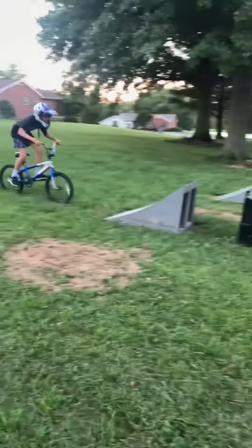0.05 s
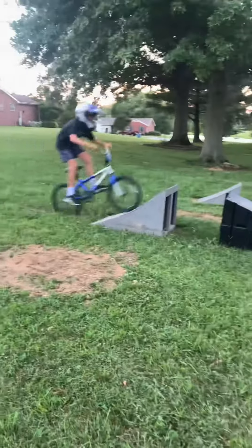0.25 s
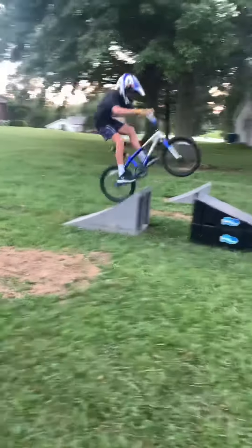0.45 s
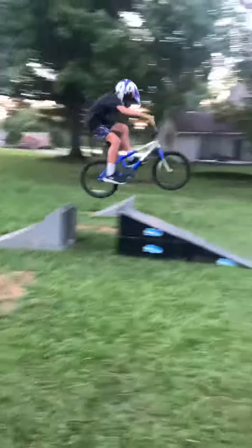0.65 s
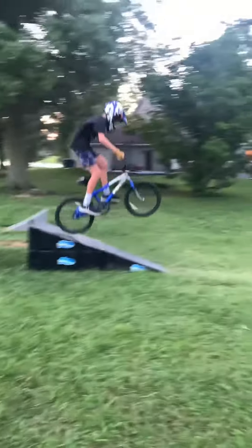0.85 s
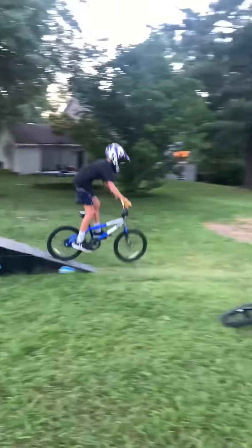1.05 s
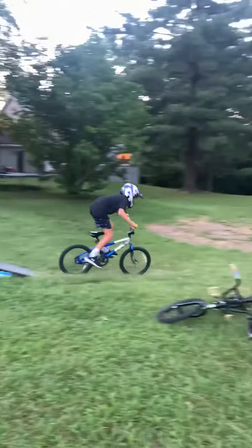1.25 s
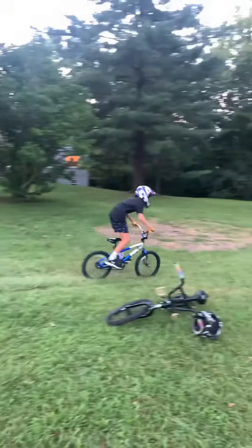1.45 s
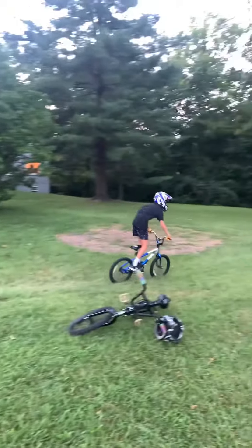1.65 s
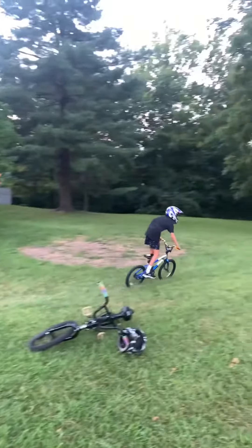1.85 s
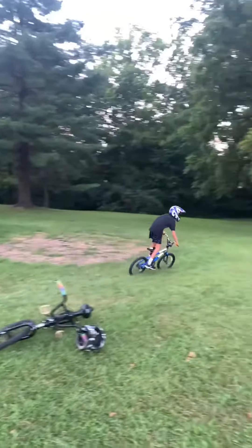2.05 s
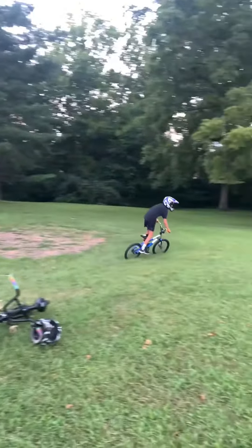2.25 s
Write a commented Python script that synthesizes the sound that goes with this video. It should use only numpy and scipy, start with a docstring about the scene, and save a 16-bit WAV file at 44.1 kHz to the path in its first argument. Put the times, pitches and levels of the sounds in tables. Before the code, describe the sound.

A bicycle jumps a ramp with hollow thumps and chain clacks, then rolls across grass.

```python
"""In a grassy yard, a child rides a small bike over a ramp, lands on a second ramp and rolls away. The tyres
rustle through the grass over a low rumble, while insects hiss in the trees over a faint far hum. Chain and
frame clack, rubber slaps the hollow ramps, each wheel's weight makes them boom, and the tread drums after the
landing. Two microphones, close together, hear it all."""
import sys
import numpy as np
from scipy import signal
from scipy.fft import rfft, irfft
from scipy.io import wavfile
from scipy.ndimage import uniform_filter1d

SR = 44100
rng = np.random.default_rng(int(sys.argv[2]) if len(sys.argv) > 2 else 0)


def transcribe(signal):
    """Save signal, clipped to [-1, 1], as a 16-bit WAV file at the path in sys.argv[1]."""
    frames = np.atleast_2d(signal).T
    limited = np.clip(frames, -1, 1)
    pcm = np.round(limited * 32767).astype(np.int16)
    wavfile.write(sys.argv[1], SR, pcm)


N = 101429
T, HZ = np.arange(N) / SR, np.fft.rfftfreq(N, 1 / SR)


def amp(db):
    """Turns decibels into a multiplier."""
    return 10 ** (np.asarray(db) / 20)


def unit(x):
    """Scales a signal to an average power of 1."""
    return x / np.sqrt(np.mean(x ** 2) + 1e-20)


def over_frequency(points):
    """Joins a table's points into a curve on a log frequency axis."""
    f, value = np.transpose(points)
    return np.interp(np.log(HZ + 1), np.log(f + 1), value)


def loudness(points):
    """Joins (time, dB) points into a volume curve."""
    return amp(np.interp(T, *np.transpose(points)))


def colour(x, tone):
    """Gives white noise a tone at the same power, fading beyond the table's ends."""
    above = 1 + (HZ / tone[-1][0] / 1.79) ** 8
    below = 1 + (tone[0][0] / 2 / (HZ + 1)) ** 4
    return irfft(rfft(x) * unit(amp(over_frequency(tone)) / above / below), N)


def noise():
    """Two unrelated white noises."""
    return rng.standard_normal((2, N))


def drift(samples):
    """A random wobble; more samples make it slower."""
    return unit(uniform_filter1d(rng.standard_normal(N), size=samples))


def burst(start, hold, fall):
    """Switches on at once, holds, then dies away."""
    return (T >= start) * np.exp(-np.maximum(T - start - hold, 0) / fall)


def ring(start, notes):
    """Notes struck together; each fades by 60 dB over its ring time."""
    t = np.maximum(T - start, 0)[T < start + max(note[2] for note in notes)]
    sound = sum(amp(db - 60 * t / ring_s) * np.sin(2 * np.pi * hz * t) for hz, db, ring_s in notes)
    return np.pad(sound, (0, N - len(t)))


def struck(start, notes, spread_db=4.5):
    """A ring whose notes are louder or softer depending on where the blow lands."""
    changes = spread_db * rng.standard_normal(len(notes))
    return ring(start, [(hz, db + change, ring_s) for (hz, db, ring_s), change in zip(notes, changes)])


def resonant(x, depth_db=3):
    """Many small parts ring briefly: random peaks a few hundred Hz wide and about 20 ms long."""
    slices = signal.stft(x, nperseg=256, noverlap=192)[2]
    peaks = uniform_filter1d(rng.standard_normal(slices.shape[1:]), 14, axis=1)  # smooth in time
    peaks = unit(uniform_filter1d(peaks, 3, axis=0))  # and in frequency
    slices *= amp(depth_db * np.minimum(peaks, 2))
    return unit(signal.istft(slices, nperseg=256, noverlap=192)[1][:, :N])


# How loud the grass rustles: t/s, level/dB
RUSTLE_LEVEL = [(0, -48.5), (.17, -49), (.26, -42.5), (.48, -50), (.62, -63), (.88, -64.5), (.91, -49),
                (1.12, -50.5), (1.19, -45.5), (1.45, -50.5), (1.68, -53), (2.3, -53)]
# Tone of the rustle: f/Hz, level/dB
RUSTLE_TONE = [(200, 0), (600, 0), (1100, -3.5), (1700, 1), (2200, -5.5), (3000, -1.5), (4000, 3.5),
               (7000, 2.5), (10500, -2), (14500, -4.5)]
# How loud the low rumble is: t/s, level/dB
RUMBLE_LEVEL = [(0, -58), (.19, -43), (.27, -33.5), (.32, -46), (.42, -44.5), (.68, -44.5), (.88, -60.5),
                (.93, -39.5), (1.15, -47), (1.27, -54), (1.5, -51), (2.3, -56.5)]
# Tone of the rumble: f/Hz, level/dB
RUMBLE_TONE = [(20, -43), (40, 6.5), (60, 9), (100, 7), (160, -2), (220, -27), (290, -13), (400, -20.5),
               (800, -21), (2000, -89)]
def tyres(blades_per_s=4000, blade_db=-0.5, clump_db=1.5):
    """Grass blades snap in clumps under the tyres, over a low rumble."""
    snaps = rng.random(N) < blades_per_s / SR
    strength = amp(blade_db * np.minimum(rng.exponential(1, N), 4))
    clumps = amp(clump_db * drift(400))
    grass = resonant(snaps * strength * clumps * noise())
    rustle = colour(grass * loudness(RUSTLE_LEVEL), RUSTLE_TONE)
    rumble = colour(noise(), RUMBLE_TONE) * loudness(RUMBLE_LEVEL)
    return rustle + rumble


# How fast each insect pulses, on average: f/Hz
INSECT_RATES = [39, 56, 87, 70]
# Tone of the chorus: f/Hz, level/dB
INSECT_TONE = [(2500, -84), (3300, -21), (4000, -5), (4800, -6), (5700, 0.5), (6800, 0), (8200, -7),
               (9300, -18), (10600, -22), (13000, -34)]
def insects(level_db=-46.5, pulse_depth=0.12, wander=0.093):
    """Far-off insects, each pulsing at its own unsteady rate, blend into a hiss."""
    chorus = np.zeros((2, N))
    for rate in INSECT_RATES:
        cycles = np.cumsum(rate * (1 + wander * drift(4000))) / SR
        chorus += noise() * (1 + pulse_depth * np.sin(2 * np.pi * (cycles + rng.random())))
    return amp(level_db) * colour(unit(chorus), INSECT_TONE)


# Notes of the hum: f/Hz, level/dB
HUM_NOTES = [(62, -62), (83, -56.5), (124, -57), (770, -73)]
# Tone of the open air: f/Hz, level/dB
AIR_TONE = [(20, -25), (45, 0), (80, -4.5), (130, -8.5), (190, -13.5), (400, -16.5), (750, -23.5),
            (1100, -30.5), (2000, -40.5), (9000, -34.5), (13400, -26), (14200, -35)]
def air_and_hum(air_db=-55.5, hum_width_hz=3.8):
    """Outdoor air and a far-off hum, whose notes waver because they are thin bands of noise."""
    hum = np.zeros((2, N))
    for hz, db in HUM_NOTES:
        band = np.exp(-((HZ - hz) / hum_width_hz) ** 2)
        hum += amp(db) * unit(irfft(rfft(noise()) * band, N))
    return hum + amp(air_db) * colour(noise(), AIR_TONE)


# Chain and frame clacks: t/s, low level/dB, middle level/dB, high level/dB, rattle length/s
CLACKS = [(0.099, -48, -52, -49, 0.013), (0.203, -40.5, -69, -59, 0.00079), (0.2084, -65, -62, -42, 0.0027),
          (0.277, -48, -43, -46, 0.0084), (0.327, -40.5, -42, -53, 0.001),
          (0.3405, -32.5, -35.5, -37, 0.005), (0.425, -43, -34, -62, 0.01), (0.49, -50, -64, -70, 0.0036),
          (0.58, -54.5, -63, -84, 0.041), (1.127, -44, -67, -48.5, 0.0083),
          (1.171, -34.5, -58, -48, 0.0043), (1.1753, -46, -52, -32, 0.0018), (1.202, -48, -68, -49, 0.0053),
          (1.247, -40.5, -70, -64, 0.0061), (1.276, -44.5, -43, -64, 0.012),
          (1.323, -46.5, -47, -64, 0.006), (1.342, -48, -53, -41.5, 0.0048),
          (1.511, -36, -39.5, -54, 0.0066), (1.7503, -36, -42, -47, 0.0018),
          (2.274, -46.5, -59, -66, 0.012)]
# Tones of a clack's low, middle and high parts, one list each: f/Hz, level/dB
CLACK_TONES = [
    [(700, -19.5), (1500, -7), (2100, -7.5), (2600, -2), (4000, 2.5), (5200, -2.5)],
    [(3800, -35), (5200, -7.5), (6500, 5.5), (7500, -3.5), (8800, 13.5), (10000, -2.5)],
    [(8000, -8), (9600, -7), (11200, 11), (13200, 5.5), (14000, 14), (16000, -47)],
]
# Notes of the steel frame: f/Hz, level/dB, ring time/s
FRAME_NOTES = [(1560, -10, 0.12), (2090, -12, 0.2), (3820, 2, 0.07), (7300, 4, .06), (8242, 3, .05),
               (11100, 0, 0.15)]
# Single spokes ping under load: t/s, f/Hz, level/dB, ring time/s
SPOKE_PINGS = [(.214, 3410, -42.5, .09), (.214, 1465, -44, .11), (.272, 3610, -38.5, .12),
               (.341, 3605, -38.5, .18), (.428, 2335, -43, .11), (.428, 2085, -50, .33),
               (.428, 3900, -35, .05), (1.247, 3820, -44, .13), (1.5135, 3830, -32, .075),
               (1.5135, 2530, -43, .045), (1.7495, 2500, -46.5, .05)]
# How loud the slack chain ticks between clacks: t/s, level/dB
TICK_LEVEL = [(.2, -54), (.45, -62), (.65, -64), (1.05, -65.5), (1.2, -51.5), (1.47, -50.5), (1.7, -63)]
def chain_and_frame(frame_db=-13, tail_db=-21, ticks_per_s=90, tick_s=0.002):
    """Chain links hit in tight clusters and tick in between; frame and spokes ring briefly."""
    rattle, steel = np.zeros((3, N)), np.zeros((2, N))
    for start, *levels_db, hold in CLACKS:
        shape = burst(start, hold, fall=0.0042) + amp(tail_db) * burst(start, hold, fall=0.028)
        rattle += amp(levels_db)[:, None] * shape
        steel[0] += amp(np.mean(levels_db) + frame_db) * struck(start, FRAME_NOTES)
    for start, *note in SPOKE_PINGS:
        steel[0] += ring(start, [note])
    ticks = rng.random(N) < ticks_per_s / SR
    fading_ticks = signal.lfilter([1], [1, -np.exp(-1 / (tick_s * SR))], ticks)
    rattle += loudness(TICK_LEVEL) * fading_ticks
    links = resonant(noise())
    return steel + sum(colour(links * part, tone) for part, tone in zip(rattle, CLACK_TONES))


# A tyre hits a ramp or the ground: t/s, level/dB, contact time/s
SLAPS = [(0.2018, -35, 0.016), (.3280, -31.5, 0.024), (0.36, -34.5, 0.022), (0.427, -37.5, 0.0024),
         (0.4883, -46, 0.002), (0.585, -47, 0.025), (1.126, -39.5, 0.007)]
# Tone of the rubber once it has flattened: f/Hz, level/dB
RUBBER_TONE = [(250, -2.5), (430, -7), (760, -13.5), (1000, -23.5), (1600, -17.5), (3500, -33)]
# Notes of the deck, the ramp's top: f/Hz, level/dB, ring time/s
DECK_NOTES = [(304.3, -6, 0.21), (375, -7, 0.092), (590, -20, 0.19), (730, -3, 0.13), (787, -6, 0.057),
              (1110, -3, 0.05), (1160, -9.5, 0.23), (1640, -13.5, 0.27)]
def tyre_slaps(slap_db=-7.5, deck_db=-9.5, start_speed=5, flatten_s=0.004):
    """Rubber slaps the deck: a crack that dulls as the tyre flattens, and a short hollow ring."""
    slap, deck = np.zeros((2, N)), np.zeros((2, N))
    rubber = colour(noise(), RUBBER_TONE)
    for start, db, hold in SLAPS:
        flattened = 1 - np.exp(-np.maximum(T - start, 0) / flatten_s)
        clock = T + (start_speed - 1) * flatten_s * flattened  # runs fast at first, raising the pitch
        crack = np.array([np.interp(clock, T, row) for row in rubber])
        slap += amp(db) * burst(start, hold, fall=0.012) * crack
        deck[0] += amp(db) * struck(start, DECK_NOTES)
    return amp(slap_db) * slap + amp(deck_db) * deck


# A wheel presses on a ramp or the ground: t/s, level/dB, starting f/Hz, press time/s
BOOMS = [(0.216, -40, 203, 0.0041), (0.3392, -26, 235, 0.008), (0.2258, -12, 175, 0.028),
         (0.3512, -6.5, 214.5, 0.0325), (0.423, -21.5, 143, 0.01), (0.488, -31, 106, 0.0062),
         (0.539, -31.5, 84, 0.0143), (0.9137, -38.5, 208, 0.008), (0.9471, -34, 104, 0.0026),
         (0.985, -32.5, 174, 0.0025), (1.009, -36, 69, 0.018), (1.132, -29.5, 77.6, 0.014),
         (1.2136, -32, 143, 0.012)]
# Notes of the ramp's panels: f/Hz, level/dB, ring time/s
PANEL_NOTES = [(69.5, -24, 0.69), (86, -29, 0.5), (121.2, -20, 0.46), (190, -27, 0.45), (233, -34, 0.24),
               (285, -32, 0.17)]
def ramp_booms(rise_s=0.011, fall_s=0.0087, sag_s=0.0164, rest_hz=49, octave_db=-14):
    """Each wheel presses on the hollow ramp: a boom sags in pitch, then the panels ring on."""
    booms = np.zeros(N)
    for start, db, hz, hold in BOOMS:
        t = np.maximum(T - start, 0)
        phase = 2 * np.pi * (rest_hz * t + (hz - rest_hz) * sag_s * (1 - np.exp(-t / sag_s)))
        rise = np.minimum(t / min(rise_s, hold / 2), 1) ** 0.95
        fall = np.exp(-(np.maximum(t - hold, 0) / fall_s) ** 2)
        octave = amp(db + octave_db) * np.sin(2 * phase)  # grows as a harder press bends the deck more
        panels = ring(start + hold / 2, PANEL_NOTES)
        booms += amp(db) * (rise * fall * (np.sin(phase) + octave) + panels)
    return booms


# Drumming after the landing: t/s, level/dB, length/s
TREAD_ROLLS = [(.905, -50, 0.044), (1.11, -49.5, 0.035)]
# Tone of the drumming: f/Hz, level/dB
TREAD_TONE = [(170, 0), (300, 1.5), (400, -23)]
def tread(fall_s=0.099):
    """Knobbly tread drums on the landing ramp and the hard ground below it."""
    rolls = sum(amp(db) * burst(start, hold, fall_s) for start, db, hold in TREAD_ROLLS)
    return colour(noise(), TREAD_TONE) * rolls


def scene():
    """Adds everything up: row 0 is sound that arrives directly, row 1 is scattered sound."""
    booms = np.array([ramp_booms(), np.zeros(N)])
    bike = booms + tyre_slaps() + chain_and_frame() + tyres() + tread()
    return bike + insects() + air_and_hum()


# How alike left and right are: f/Hz, likeness (0 to 1)
LIKENESS = [(90, 0.99), (250, 0.92), (600, 0.65), (1200, 0.064), (2500, 0.56), (3500, 0.38), (4700, 1),
            (5600, 0.84), (7000, 0.9), (7900, 0.9), (8950, 1), (9900, 0.86), (11000, 0.26), (13000, 1)]
# How far the left wave runs ahead of the right: f/Hz, phase/radians
LEFT_LEAD = [(0, 0), (250, -.15), (900, -1.0), (1500, .5), (3200, 1.1), (4700, 3.14), (6400, 6.0),
             (7400, 6.5), (8600, 9.2), (9300, 9.6), (10400, 12.3), (11500, 12.8), (12800, 15.4),
             (14000, 15.9)]
# How much louder the left is than the right: f/Hz, level/dB
BALANCE = [(100, 0.8), (600, 0.5), (1100, -2.5), (2200, -1.5), (4000, 0)]
def record(dry, low_cut_hz=52.3, high_cut_hz=15800):
    """Two microphones blend direct and scattered sound, and lose the deepest bass and highest treble."""
    direct, scattered = rfft(dry)
    alike = np.clip(over_frequency(LIKENESS), 0, 1)
    shared = direct * np.sqrt((1 + alike) / 2)
    apart = scattered * np.sqrt((1 - alike) / 2)
    lead = np.interp(HZ, *np.transpose(LEFT_LEAD))
    lean = np.exp(0.5j * lead) * amp(over_frequency(BALANCE) / 2)  # each side takes half
    left, right = (shared + apart) * lean, (shared - apart) / lean
    low_cut = 1 / np.sqrt(1 + (low_cut_hz / (HZ + 1)) ** 4)
    high_cut = 1 / np.sqrt(1 + (HZ / high_cut_hz) ** 160)
    return irfft(np.array([left, right]) * low_cut * high_cut, N)


dry = scene()
out = record(dry)
transcribe(out)
```